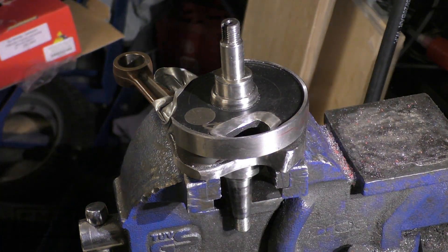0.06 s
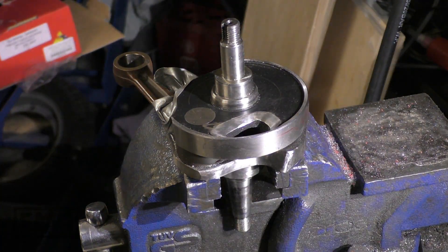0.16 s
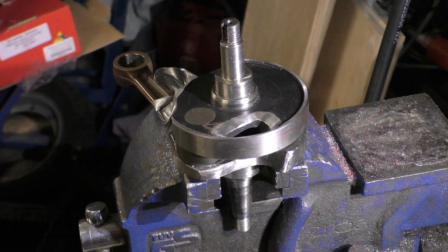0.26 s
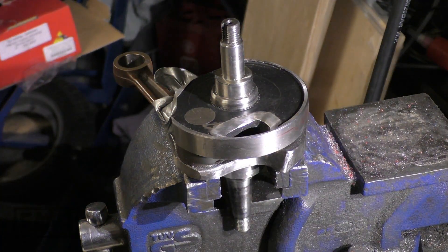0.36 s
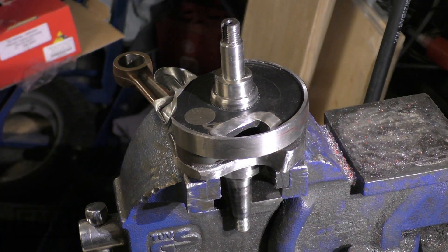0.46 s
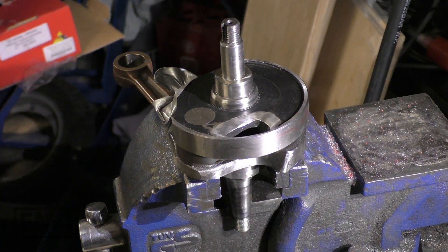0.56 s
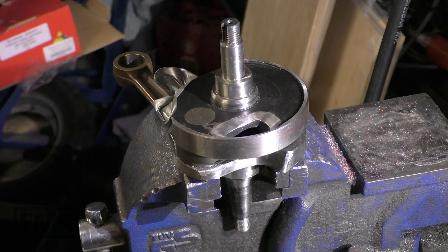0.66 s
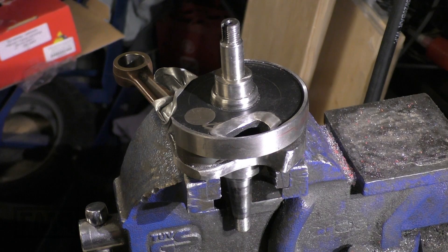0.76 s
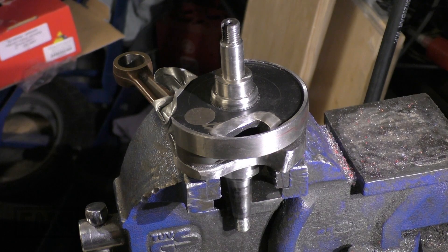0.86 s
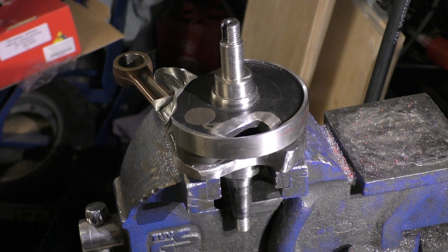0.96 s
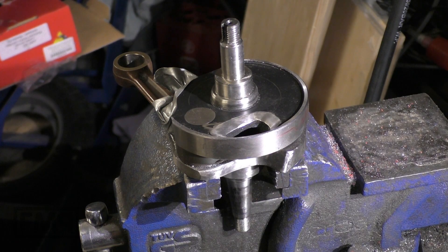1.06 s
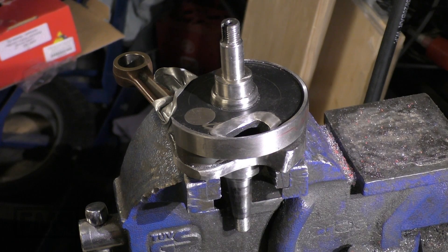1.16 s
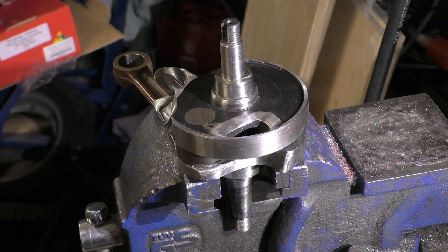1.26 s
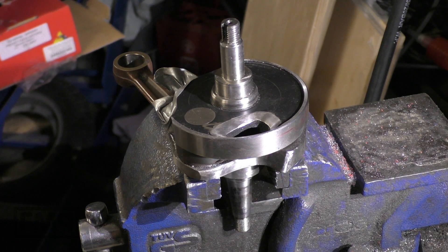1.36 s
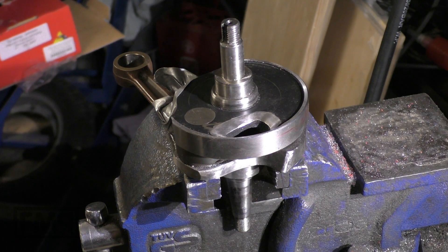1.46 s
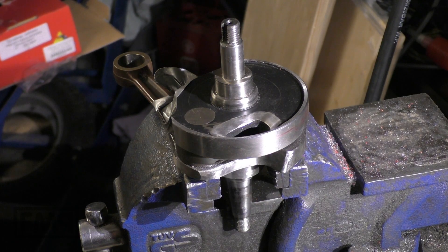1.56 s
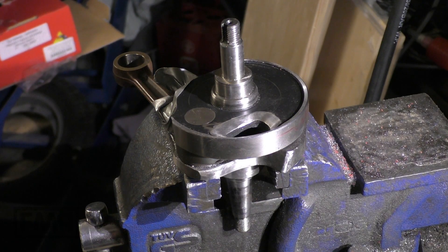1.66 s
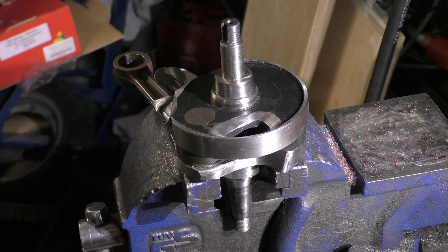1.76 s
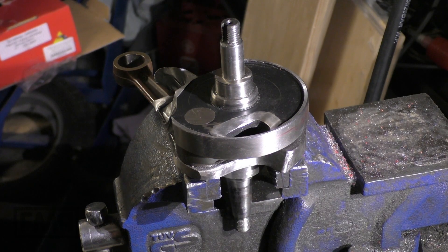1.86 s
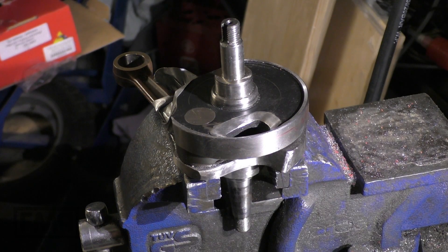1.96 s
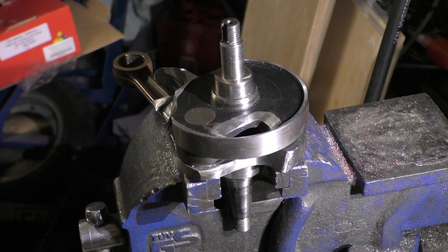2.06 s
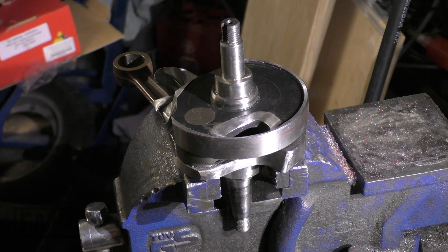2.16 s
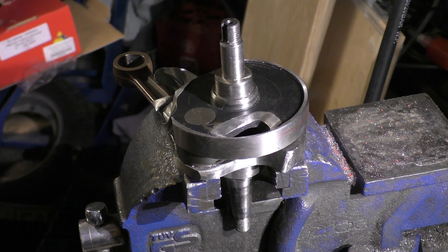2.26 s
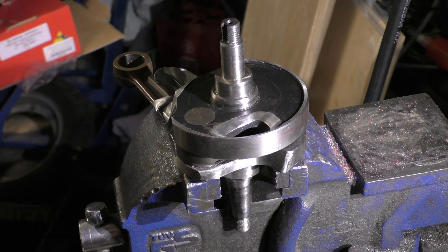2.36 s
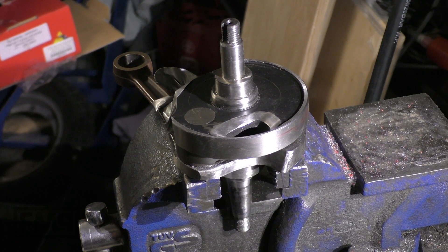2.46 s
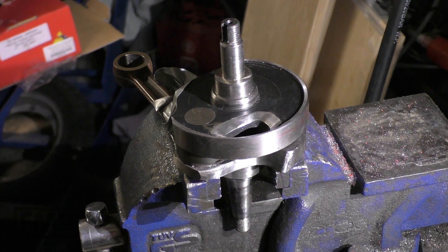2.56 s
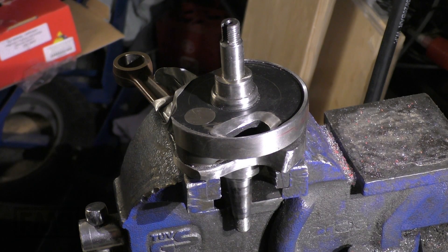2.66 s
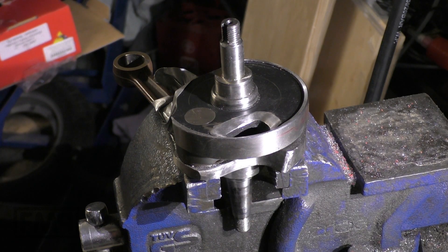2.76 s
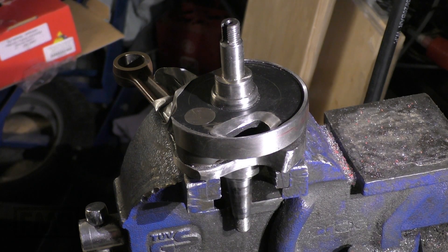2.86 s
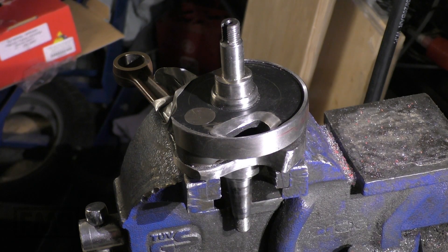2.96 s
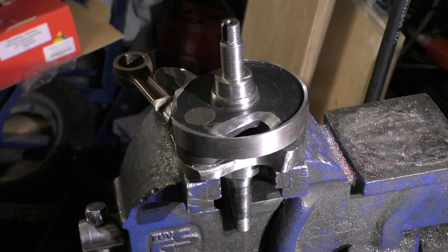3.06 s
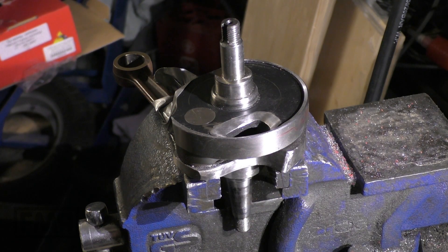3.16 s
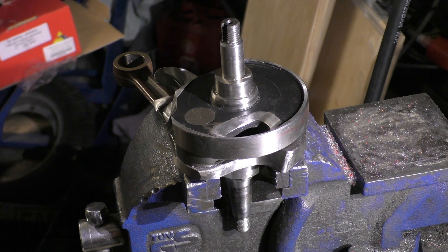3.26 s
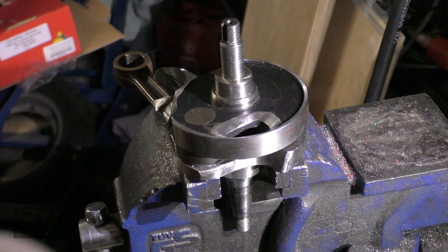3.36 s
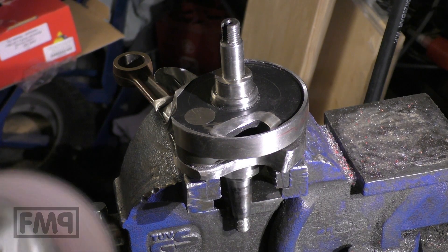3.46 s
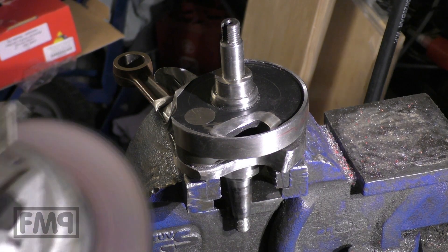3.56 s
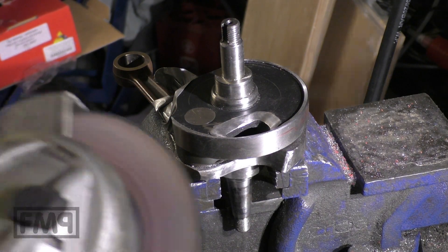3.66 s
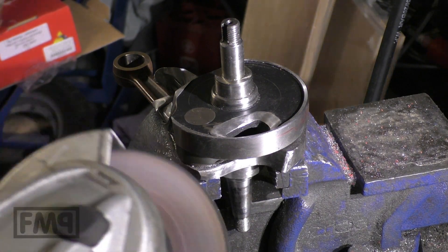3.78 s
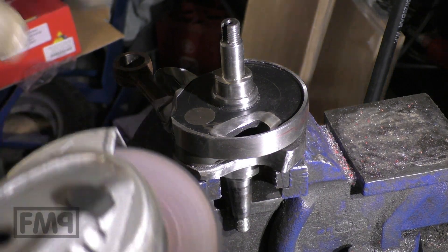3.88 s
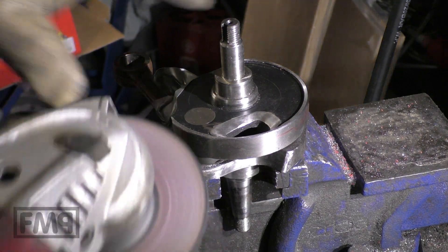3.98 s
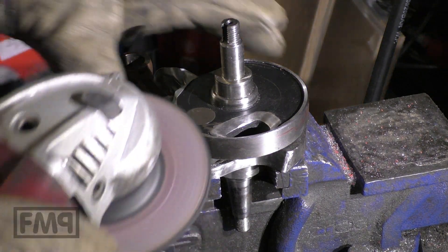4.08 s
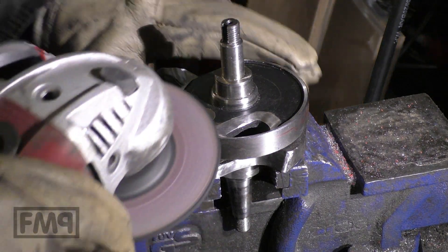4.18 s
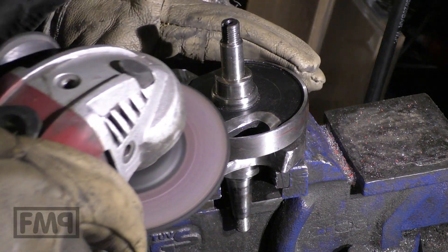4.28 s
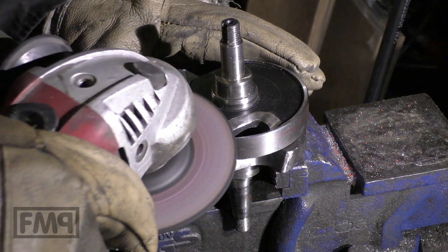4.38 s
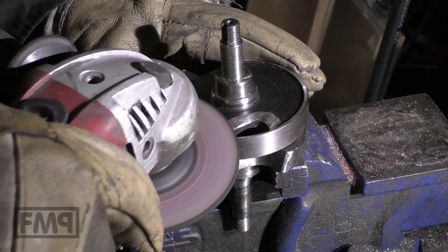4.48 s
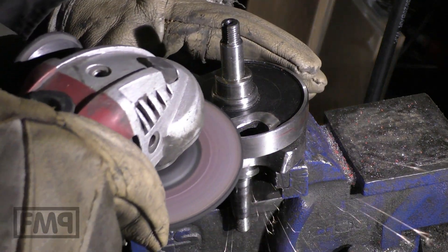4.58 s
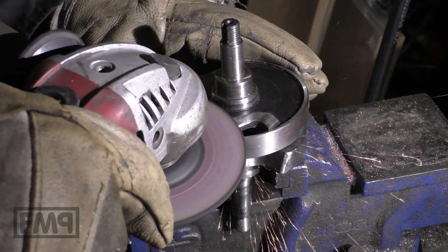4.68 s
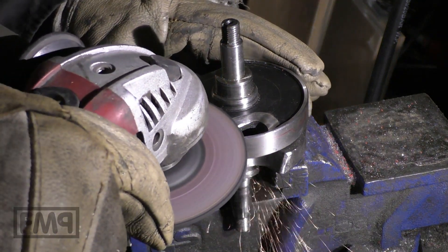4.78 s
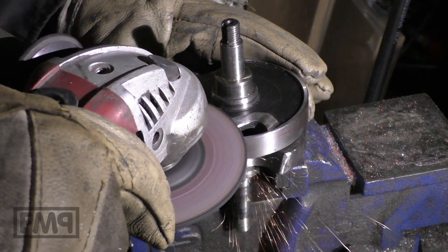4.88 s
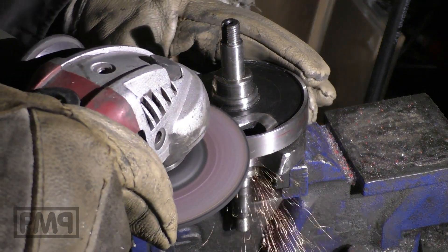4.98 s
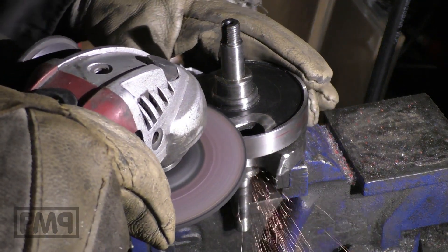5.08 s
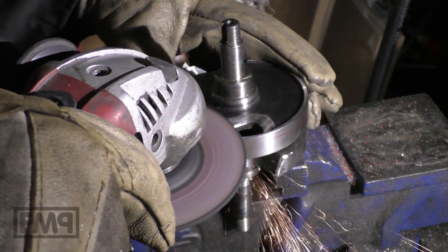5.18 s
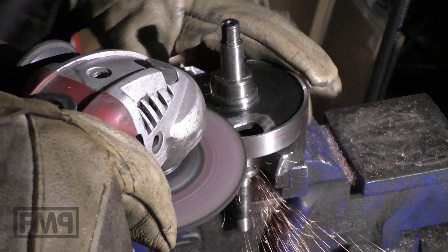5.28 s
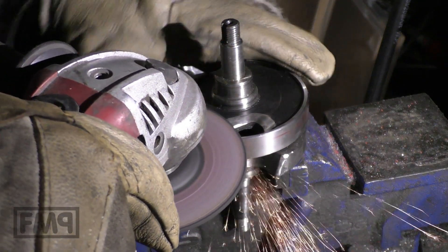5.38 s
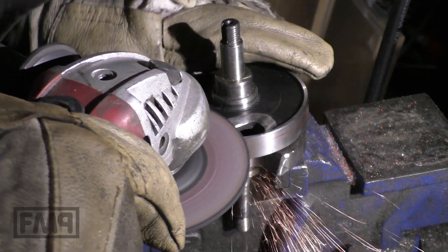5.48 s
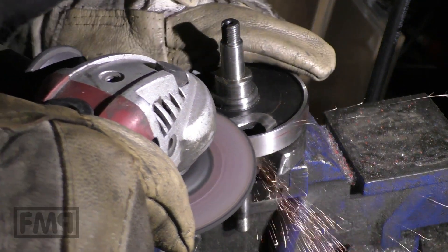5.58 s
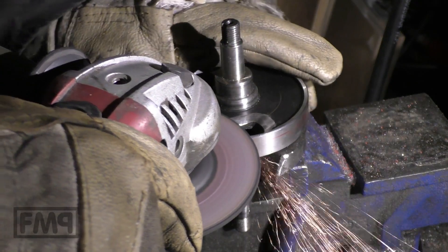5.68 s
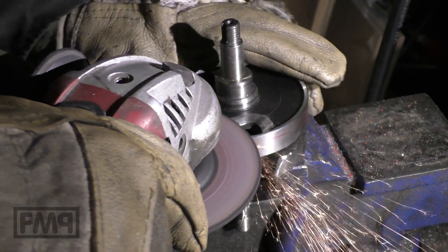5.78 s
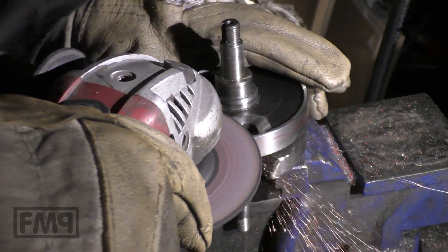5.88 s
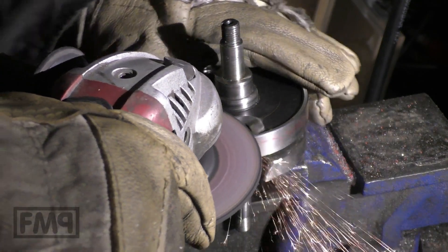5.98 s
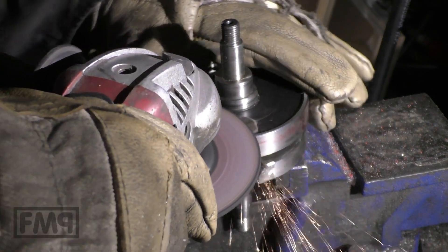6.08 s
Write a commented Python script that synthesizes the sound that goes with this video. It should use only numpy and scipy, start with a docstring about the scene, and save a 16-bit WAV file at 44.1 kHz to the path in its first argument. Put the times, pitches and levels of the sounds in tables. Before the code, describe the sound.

Gloves rustle and a tool housing clicks, then an angle grinder snaps on, whines up to speed, and grinds screeching into ringing steel.

```python
"""A low workshop rumble lies under gloves rustling and the housing of an angle grinder clicking and bumping.
The switch snaps with a thump, and the motor runs up: its gears whine and knock, its fan makes an airy rush,
and armature and disc hum. A soft puff passes as the tool moves across from the left to a vice.
The disc first grazes a steel part, then is pushed against it: it bites once a turn, at times bouncing.
Gritty noise drives the resonances of the steel, which ring high, while the vice shudders below."""
import sys
import numpy as np
from scipy import signal
from scipy.fft import rfft, irfft
from scipy.io import wavfile
from scipy.ndimage import uniform_filter1d

SR = 44100
rng = np.random.default_rng(int(sys.argv[2]) if len(sys.argv) > 2 else 0)


def int16_out(signal):
    """Quantize to a 16-bit WAV file."""
    q = np.round(np.clip(np.atleast_2d(signal).T, -1, 1) * 32767)
    wavfile.write(sys.argv[1], SR, q.astype(np.int16))


N = 270333
T = np.arange(N) / SR  # time in seconds
SWITCH_S, TOUCH_S = 2.819, 4.7  # the motor is switched on; the disc begins to press on the steel
PINION_TEETH, CROWN_TEETH = 12, 37  # the small gear on the armature and the large one on the disc


def undb(db):
    """Turn decibels into gain."""
    return 10 ** (np.asarray(db) / 20)


def unit(x):
    """Scale a signal to an rms (average strength) of 1."""
    return x / np.sqrt(np.mean(x ** 2))


def noise():
    """White noise: every frequency equally strong."""
    return rng.standard_normal(N)


def walk(rate):
    """A smooth random wander with rms 1, taking about `rate` new values per second."""
    hold = int(SR / rate)
    steps = np.repeat(rng.standard_normal(N // hold + 1), hold)[:N]
    return unit(uniform_filter1d(steps, hold))


def colour(x, points):
    """Filter to a spectrum of (Hz, dB) points without looking ahead; white noise keeps its level."""
    size = 4096
    hz, db = np.transpose(points)
    octave = np.log2(np.maximum(np.arange(size // 2 + 1) * SR / size, 10))
    gain = unit(undb(np.interp(octave, np.log2(hz), db)))
    # folding the cepstrum gives a filter that responds as early as it can (minimum phase)
    cepstrum = irfft(np.log(gain))
    cepstrum[1:size // 2] *= 2
    cepstrum[size // 2 + 1:] = 0
    response = irfft(np.exp(rfft(cepstrum)))
    return signal.fftconvolve(x, response)[:N]


def ring(x, modes):
    """Drive decaying resonances (Hz, width Hz, dB) with x; white noise keeps its level."""
    t = T[:SR // 10]
    response = 0
    for k, (hz, width, db) in enumerate(modes):
        decay = width * np.exp(-np.pi * width * t)  # a wider resonance dies sooner
        response = response + (-1) ** k * undb(db) * decay * np.cos(2 * np.pi * hz * t)
    response[0] /= 2  # a half first step keeps the bass out
    return signal.oaconvolve(x, response / np.sqrt(np.sum(response ** 2)))[:N]


def fade(start, t60):
    """Start suddenly, then decay by 60 dB every t60 seconds."""
    return (T >= start) * undb(-60 * np.maximum(T - start, 0) / t60)


def ramp(start, length):
    """Rise in a straight line from 0 to 1."""
    return np.clip((T - start) / length, 0, 1)


def spell(start, length, edge):
    """Rise, hold and release."""
    return ramp(start, edge) - ramp(start + length, edge)


# The rumble of the workshop. Each row: frequency in Hz, height of the spectrum in dB.
RUMBLE = [(15, -54), (25, -8), (81, -8.5), (131, -8.5), (172, -13.5), (207, -10), (231, -16), (354, -19),
          (604, -31.5), (811, -37), (1120, -29), (1500, -32), (15000, -54)]


def workshop():
    """A low, diffuse rumble, mostly different left and right, which sinks once the tool runs."""
    sink_db = -8.7 * ramp(SWITCH_S, 0.069)
    level_db = -58 + sink_db + 0.7 * walk(15)
    shared = noise()
    sides = [colour(0.32 * shared + 1.07 * noise(), RUMBLE) for _ in range(2)]
    return np.array(sides) * undb(level_db)


# Strokes of leather gloves and sleeves. Each row: middle in seconds, level in dB, half length in seconds.
STROKES = [(0, -56.5, 0.066), (0.864, -60.5, .08), (0.946, -52, 0.045), (1.152, -58, .04),
           (1.557, -61, 0.09), (1.748, -56, 0.069), (1.987, -60, 0.17), (2.24, -61.5, .06),
           (2.782, -62.5, .025)]
# The sound of rubbed leather. Each row: frequency in Hz, height of the spectrum in dB.
LEATHER = [(150, -6), (335, 9.5), (620, -11), (1200, -5), (2600, -4.5), (4200, -8), (6200, -8.5),
           (8500, -12.5), (15000, -20)]


def rustle():
    """Leather rubs in tiny slips, heard as unevenly flickering noise until the switch snaps."""
    power = undb(-74.5) ** 2  # the gloves never lie quite still
    for middle, db, half in STROKES:
        power = power + (undb(db) / np.cosh((T - middle) / half)) ** 2
    slips = unit(noise() * undb(1.8 * walk(900) + 1.3 * walk(60)))
    return colour(slips, LEATHER) * np.sqrt(power) * (T < SWITCH_S)


# Clicks and short scrapes of the housing, handled and switched on. Each row: start in seconds, level in dB,
# brightness in dB per octave, time to decay by 60 dB in seconds.
CLICKS = [(.004, -42.5, -0.5, 0.053), (.66, -55, -11, 0.02), (.907, -49, 10, 0.16),
          (0.923, -41, -2.5, 0.067), (0.942, -39, 1.5, 0.044), (.966, -41.5, -1.5, .035),
          (1.055, -39.5, -4, 0.024), (1.127, -49, 3, 0.0088), (1.366, -48.5, -8, .03),
          (1.426, -44.5, 3, 0.022), (1.66, -48.5, -0.5, 0.082), (1.775, -48.5, -2.5, .04),
          (2.163, -49.5, -7, 0.06), (2.276, -47, -4.5, 0.038), (2.806, -46, 1, .12),
          (2.817, -12.5, 7.5, .012), (2.82, -8.5, 0.5, 0.016)]
# Resonances of the plastic housing. Each row: frequency in Hz, width in Hz, height in dB before brightness.
HOUSING = [(360, 130, -17), (1246, 480, -3.5), (2390, 590, -2), (3320, 720, -0.5), (4480, 360, 1.5),
           (5750, 1030, -3.5), (8700, 6200, -16)]


def clicks():
    """Short bursts of noise ring the housing; a harder contact favours its higher resonances."""
    total = 0
    for start, db, bright, t60 in CLICKS:
        modes = [(hz, width, mode_db + bright * np.log2(hz)) for hz, width, mode_db in HOUSING]
        total = total + undb(db) * ring(noise() * fade(start, t60), modes)
    return total


# Dull bumps of the tool's body. Each row: start in seconds, level in dB, pitch in Hz,
# time to decay by 60 dB in seconds.
BUMPS = [(0.583, -57, 450, 0.033), (1.367, -38, 518, 0.023), (1.366, -50, 200, 0.11),
         (1.381, -51, 450, .04), (1.429, -47.5, 390, 0.038), (2.127, -52, 219, 0.15),
         (2.819, -32, 454, 0.03)]
# What a bump rings with. Each row: multiple of its pitch, level in dB relative to the bump.
BODY = [(.7, -5), (1, 0), (1.4, -2), (1.9, -4.5), (3.2, -15)]


def bumps():
    """The struck body of the tool rings with a few dying tones that are not harmonics."""
    total = 0
    for start, db, hz, t60 in BUMPS:
        for k, (ratio, part_db) in enumerate(BODY):
            tone = np.sin(2 * np.pi * hz * ratio * (T - start)) * fade(start, t60)
            total = total + (-1) ** k * undb(db + part_db) * tone
    return total


# The low thump with the snap of the switch. The row: level on the left in dB, pitch in Hz,
# time to decay by 60 dB in seconds, right minus left level in dB.
THUMP = (-14.5, 127, 0.02, -9)


def thump():
    """The motor jerks into motion: a brief low tone, out of phase and weaker on the right."""
    db, hz, t60, right_db = THUMP
    left = undb(db) * np.sin(2 * np.pi * hz * (T - SWITCH_S)) * fade(SWITCH_S, t60)
    return np.array([left, -undb(right_db) * left])


def motor_speed():
    """Turns per second: the armature kicks off, climbs to its free speed, and sags under load."""
    kick_s, climb_s, kick_share = .0755, .3794, .548  # two time constants; the kick's share of the speed
    sag_hz, sag_s = 21.6, .72  # how far the speed sags on the steel, and its time constant
    running, loaded = np.maximum(T - SWITCH_S, 0), np.maximum(T - TOUCH_S, 0)
    lag = kick_share * np.exp(-running / kick_s) + (1 - kick_share) * np.exp(-running / climb_s)
    return FREE_HZ * (1 - lag) - sag_hz * (1 - np.exp(-loaded / sag_s))


FREE_HZ = 531.95  # turns per second of the armature, running free
LOAD_S = 0.17  # time constant with which the teeth take up the load


def loudness(law, motor_hz, carried):
    """Level in dB of one sound of the tool, from its speed, its place and the load."""
    free_db, speed_db, vice_db, load_db = law
    doublings = np.log2(np.maximum(motor_hz, 1) / FREE_HZ)
    load = 1 - np.exp(-np.maximum(T - TOUCH_S, 0) / LOAD_S)
    return free_db + speed_db * doublings + vice_db * carried + load_db * load


# How loud the gears whine and rattle. Each row: level at free speed in dB, rise in dB per doubling of speed,
# change in dB at the vice, change in dB under load.
WHINE = (-35.5, 32, .5, -4.5)
RATTLE = (-31.3, 4, -5, -7)
# The hardest knocks of the gear teeth across their play. Each row: start in seconds, level in dB.
GEAR_KNOCKS = [(2.822, -12), (2.8676, -23), (2.8815, -25.5), (2.9004, -27), (2.9627, -23.5), (3.004, -17),
               (3.0435, -21), (3.0845, -20), (3.1664, -18.5), (3.251, -17), (3.3146, -18.5), (3.456, -18.5),
               (3.491, -21), (3.521, -19), (3.5403, -22), (3.917, -23.5), (4.0343, -21), (4.141, -21),
               (4.1975, -21), (4.4109, -23), (4.473, -24), (4.7637, -21), (5.311, -25), (5.3373, -26)]
# Resonances of the gearbox. Each row: frequency in Hz, width in Hz, height in dB.
GEARBOX = [(1302, 94, -3.5), (2600, 550, -14), (3730, 280, -2), (4460, 230, 1.5), (4693, 150, 6),
           (5900, 210, -6.5), (8300, 840, -30), (10900, 330, -15)]


def gears(motor_hz, turns, carried):
    """Meshing teeth whine; lightly loaded, they knock across their play in uneven flurries."""
    whine_db = loudness(WHINE, motor_hz, carried)
    rattle_db = loudness(RATTLE, motor_hz, carried)
    mesh = PINION_TEETH * turns + 0.069 * walk(65)
    whine = np.sqrt(2) * np.sin(2 * np.pi * mesh) * undb(whine_db + 1.8 * walk(30))
    # the armature runs slightly out of true, which adds a tone one turn below the mesh
    sideband = np.sin(2 * np.pi * (mesh - turns + .2 * walk(120))) * undb(whine_db - 10)
    contacts = rng.random(N) < 2000 / SR  # about 2000 random knocks per second
    flurries = undb(4.1 * walk(260) + 1.4 * walk(45))
    knocks = unit(contacts * rng.choice([-1, 1], N) * flurries)
    hardest = sum(undb(db) * fade(start, 0.032) for start, db in GEAR_KNOCKS)
    return whine + sideband + ring(knocks * undb(rattle_db) + hardest * noise(), GEARBOX)


# How loud the cooling air rushes. The row: level at free speed in dB, rise in dB per doubling of speed,
# change in dB at the vice, change in dB under load.
RUSH = (-28, 6, -1.83, -3.5)
# The sound of air and brushes. Each row: frequency in Hz, height of the spectrum in dB.
AIR = [(60, -41), (200, -19), (430, -11), (620, -17.5), (820, -15), (1250, -2), (1700, -2), (3200, -1),
       (6200, -1.5), (7000, -5), (8500, -6), (9600, -10), (11100, -6), (15500, -15.5)]


def fan(motor_hz, turns, carried):
    """Cooling air and brushes hiss, fluttering a little with each turn; the vents beam the treble."""
    flutter = undb(1.24 * walk(300) + .5 * walk(24.89) + 1.04 * np.sin(2 * np.pi * turns))
    air = colour(noise() * flutter, AIR) * undb(loudness(RUSH, motor_hz, carried))
    # the vents turn towards the vice on the way: the treble goes from -2.5 to 3 dB
    vents_db = -2.5 + 5.5 * carried
    highpass = signal.butter(2, 7000, "high", fs=SR, output="sos")
    treble = signal.sosfiltfilt(highpass, air)
    return air + treble * (undb(vents_db) - 1)


# How loud the armature hums. The row: level at free speed in dB, rise in dB per doubling of speed,
# change in dB at the vice, change in dB under load.
HUM = (-54.5, 5.5, 1, -3.5)
# The hum swells as it passes this resonance of the housing. The row: frequency in Hz, width in Hz, lift in dB.
HUM_RESONANCE = (391, 53, 10)


def unbalance(motor_hz, turns, disc_turns, carried):
    """Armature and disc each hum at their own turning rate, the disc mainly when it nears full speed."""
    hz, width, lift_db = HUM_RESONANCE
    swell_db = lift_db * np.exp(-((motor_hz - hz) / width) ** 2)
    hum_db = loudness(HUM, motor_hz, carried) + swell_db + 1.0 * walk(16)
    armature = np.sqrt(2) * np.sin(2 * np.pi * turns) * undb(hum_db)
    once = np.sin(2 * np.pi * disc_turns) * undb(-65.5)
    twice = np.sin(4 * np.pi * disc_turns) * undb(-61)
    return armature + (motor_hz / FREE_HZ) ** 4 * (once + twice)


# The fan's draught brushes the microphone. The row: middle in seconds, level in dB, half length in seconds.
DRAUGHT = (3.52, -45, 0.013)


def draught():
    """A soft low puff of noise, different left and right."""
    middle, db, half = DRAUGHT
    puff = [(25, -18), (85, 0), (140, -6.5), (300, -37), (2000, -70)]  # Hz, dB
    sides = np.array([colour(noise(), puff) for _ in range(2)])
    return sides * undb(db) * np.exp(-((T - middle) / half) ** 2)


# The disc grazes the steel. Each row: start in seconds, level in dB, time to decay by 60 dB in seconds.
GRAZES = [(4.546, -26.5, 0.082)]
# The disc is pushed against the steel. Each row: start in seconds, length in seconds, level in dB,
# change of the lower resonances of the steel in dB.
PUSHES = [(4.697, .24, -29, 1.5), (4.941, 0.54, -29, -1.5), (5.489, .14, -30, 2), (5.631, 0.296, -26, -1),
          (5.93, .17, -27, -4)]
PUSH_EDGE_S = 0.046  # pressure builds and eases over this time
# Spells in which the tool bounces. Each row: start in seconds, length in seconds,
# how far every second bite is skipped, from 0 to 1.
BOUNCES = [(4.907, 0.565, 0.88), (5.96, 0.16, 1)]
BOUNCE_EDGE_S, BOUNCE_REST = 0.05, .25  # a spell builds over this time; the skip between spells (0-1)
# Resonances of the steel part. Each row: frequency in Hz, width in Hz, height in dB.
STEEL = [(2670, 260, -8.5), (4640, 150, -9.5), (5130, 130, -6), (5450, 135, -7.5), (5795, 130, -8),
         (7010, 87, -4), (8320, 130, -4), (8840, 68, -3.5), (9030, 49, 1.5), (9530, 130, -2),
         (9900, 92, -13), (11300, 150, 0.5), (11460, 120, -11), (11800, 180, -19), (13840, 170, -6),
         (13800, 120, -7)]
# The scratching of grit. Each row: frequency in Hz, height of the spectrum in dB.
GRIT = [(200, -41), (800, -26), (1400, -12), (2800, -1), (6000, -9), (7500, 2.5), (10000, 4.5), (12800, -5),
        (15500, -17)]
# The vice and the tool's body, shaken by each bite. Each row: frequency in Hz, width in Hz, height in dB.
VICE = [(238, 16, 0), (338, 43, -7.5)]


def disc_bites(disc_turns):
    """The high spot of the disc bites once a turn; when the tool bounces, every second bite is weak."""
    bounce = BOUNCE_REST
    for start, length, depth in BOUNCES:
        bounce = bounce + (depth - BOUNCE_REST) * spell(start, length, BOUNCE_EDGE_S)
    turn, phase = disc_turns.astype(int), disc_turns % 1
    chance = rng.standard_normal((turn[-1] + 1, 2))
    # now and then the bounce slips by one turn
    skipped = (turn + np.cumsum(chance[:, 1] > 1.6)[turn]) % 2
    force = undb(1.0 * chance[turn, 0]) * (1 - np.clip(bounce, 0, 1) * skipped)
    return force * (1 - np.exp(-phase / .08)) * np.exp(-(phase / .38) ** 2)


def grinding(disc_turns):
    """Biting grains make the steel screech and scratch, and shake the vice and the tool's body."""
    push = sum(undb(db) * spell(start, length, PUSH_EDGE_S) for start, length, db, _ in PUSHES)
    lower_db = sum(db * spell(start, length, PUSH_EDGE_S) for start, length, _, db in PUSHES)
    bite = disc_bites(disc_turns)
    pressure = .16 + bite  # the disc also rubs between bites
    pressure = pressure / np.sqrt(uniform_filter1d(pressure ** 2, SR // 20))  # even out the average level
    touching = ramp(TOUCH_S, 0.092)
    grazing = sum(undb(db) * fade(start, t60) for start, db, t60 in GRAZES)
    contact = pressure * push * touching + grazing
    # the same grains on the rim come round every turn, among others that break away
    rim = unit(irfft(np.exp(2j * np.pi * rng.random(128)), 4096))
    repeating = rim[(disc_turns % 1 * len(rim)).astype(int)]
    grains = unit(.5 * repeating + noise() * undb(1.5 * walk(4000))) * contact
    # as the point of contact wanders, each mode of the steel swells and sinks
    weights = unit(np.array([undb(db) * np.sqrt(width) for _, width, db in STEEL])) / np.sqrt(len(STEEL))
    screech = 0
    for weight, mode in zip(weights, STEEL):
        is_lower = mode[0] < 10700
        drive = grains * undb(1.3 * walk(9) + lower_db * is_lower)
        screech = screech + weight * ring(drive, [mode])
    scratch = colour(noise() * contact, GRIT)
    shudder = unit(ring(bite * touching, VICE)) * undb(2.0 * walk(11))
    return screech + undb(-7.5) * scratch + undb(-66.5) * shudder


def pan(x, db):
    """Place a sound by its left minus right level."""
    return x * undb(np.array([db + 0 * T, -db + 0 * T]) / 2)


def room(x, t60, wet_db):
    """Close, cluttered walls: a short, coloured echo of decaying noise that differs left and right."""
    t = T[:SR // 2]
    tails = rng.standard_normal((2, len(t))) * undb(-60 * t / t60) * (t > .003)
    walls = [(100, -5), (2500, 4), (6000, -0.5), (8500, -11.5), (14000, 3.5), (18000, -2)]  # Hz, dB
    coloured = colour(x, walls)
    echoes = [signal.fftconvolve(coloured, tail / np.sqrt(np.sum(tail ** 2)))[:N] for tail in tails]
    return undb(wet_db) * np.array(echoes)


def scene():
    """Handling off to the left, then the running tool moves in to the vice and grinds."""
    hands = rustle() + clicks() + bumps()
    motor_hz = motor_speed()
    carried = ramp(3.36, 1.3)  # the tool's way to the vice: start and length in seconds
    tool_pan_db = 2.5 - 2.8 * carried  # left minus right: from 2.5 to -0.3 dB
    turns = np.cumsum(motor_hz) / SR
    disc_turns = turns * PINION_TEETH / CROWN_TEETH
    tool = gears(motor_hz, turns, carried) + fan(motor_hz, turns, carried)
    tool = tool + unbalance(motor_hz, turns, disc_turns, carried)
    tool = tool * ramp(SWITCH_S, .005)  # silent until switched on
    steel = grinding(disc_turns)
    direct = pan(hands, 4.4) + pan(tool, tool_pan_db) + pan(steel, -.3)
    echoes = room(hands, 0.23, -6.5) + room(tool, 0.19, -9.5) + room(steel, 0.12, -14.5)
    return workshop() + direct + echoes + thump() + draught()


def record(dry):
    """Round the loudest peaks softly and cut the top above 15750 Hz."""
    ceiling = 0.53
    rounded = ceiling * np.tanh(dry / ceiling)
    lowpass = signal.ellip(10, .2, 80, 15750, fs=SR, output="sos")
    return signal.sosfilt(lowpass, rounded)


dry = scene()
out = record(dry)
int16_out(out)
```